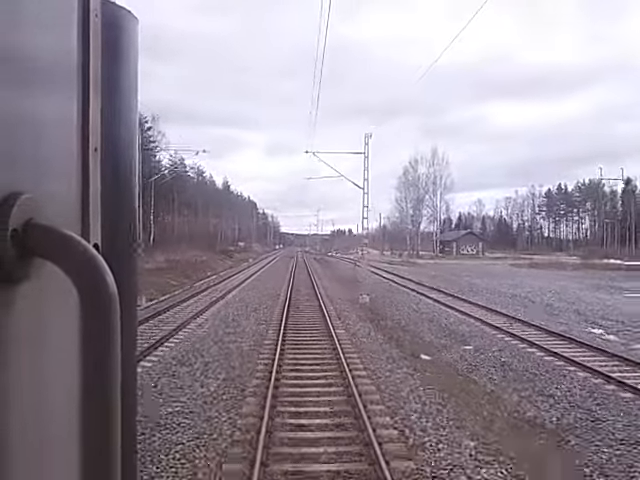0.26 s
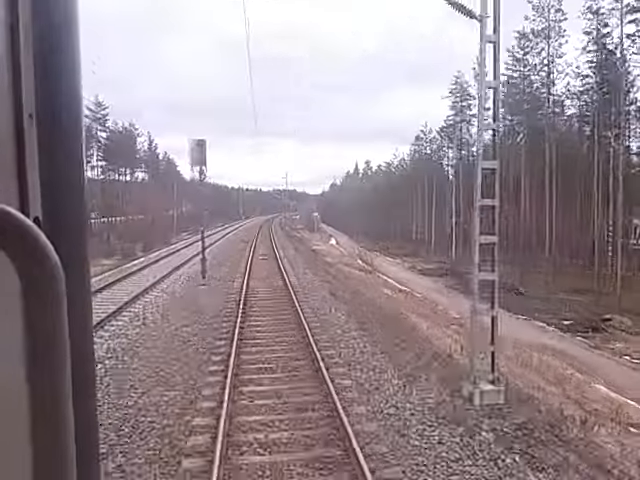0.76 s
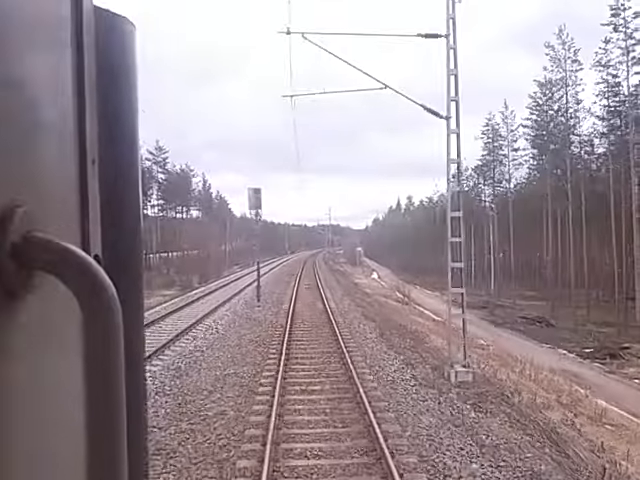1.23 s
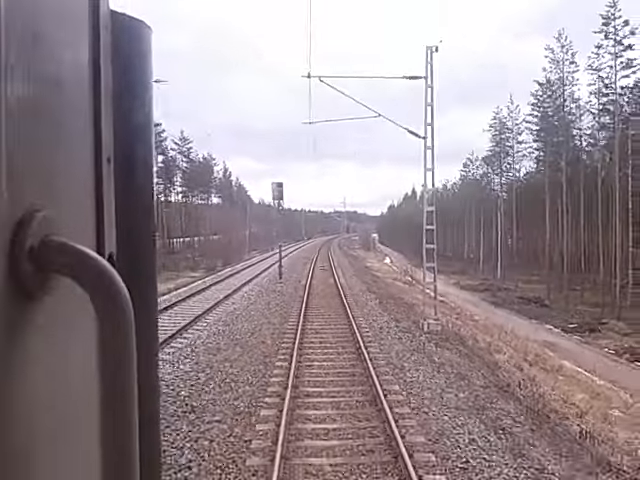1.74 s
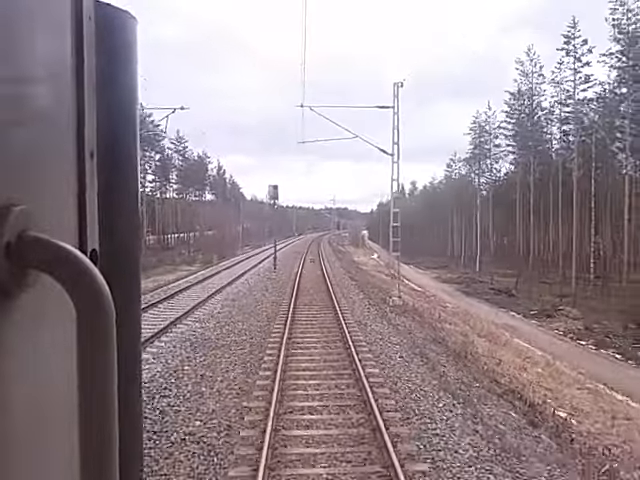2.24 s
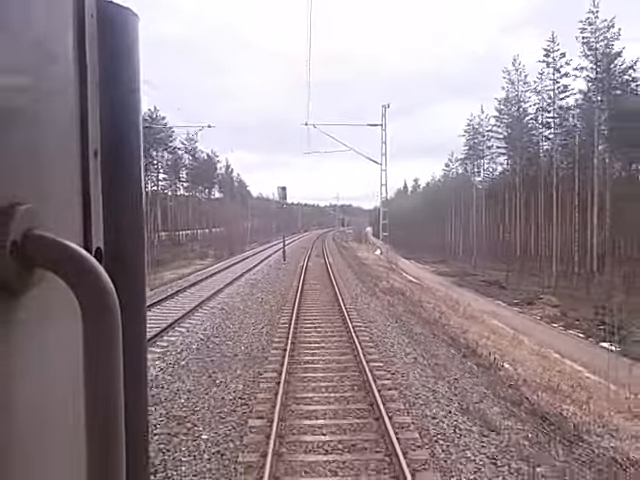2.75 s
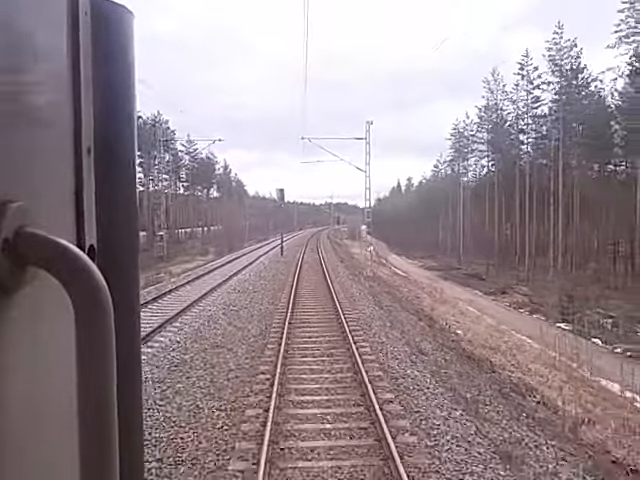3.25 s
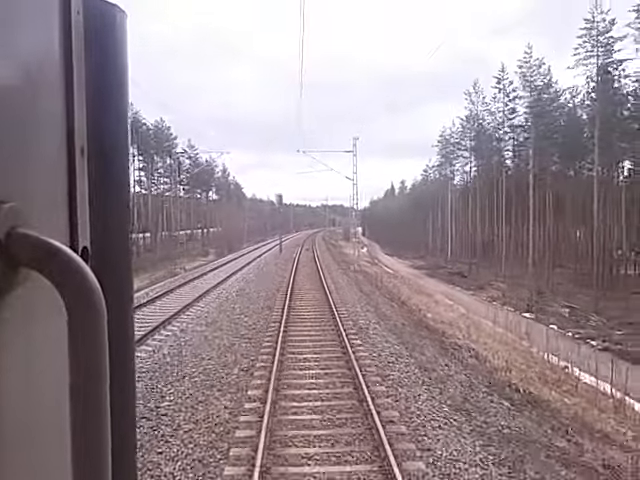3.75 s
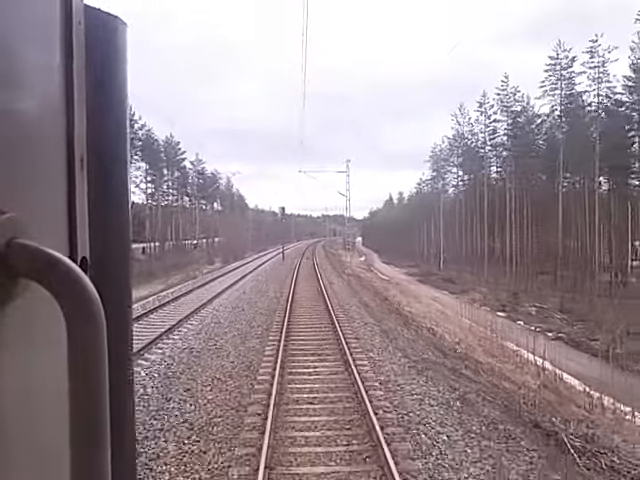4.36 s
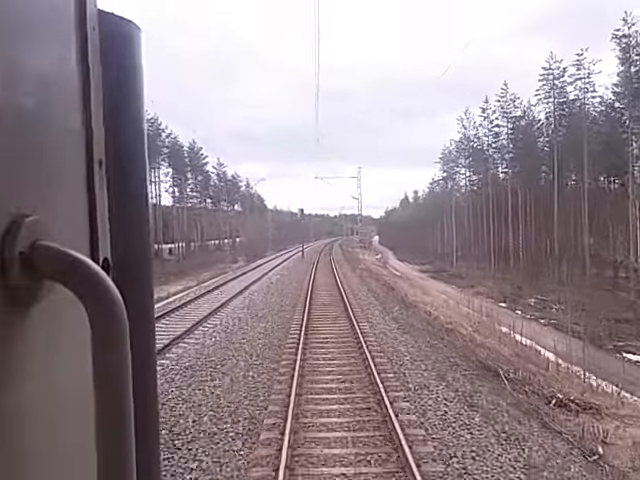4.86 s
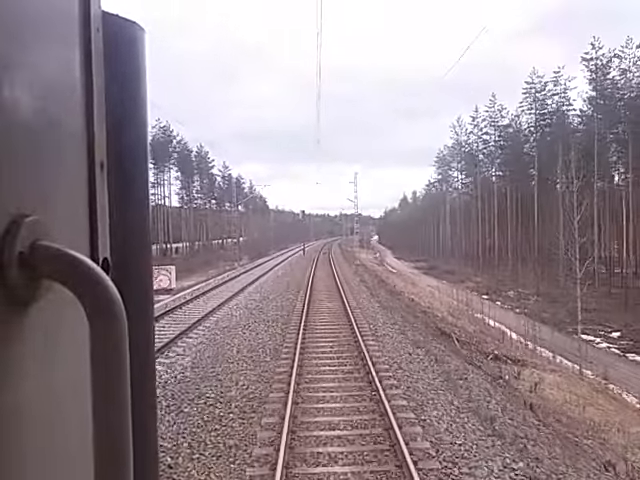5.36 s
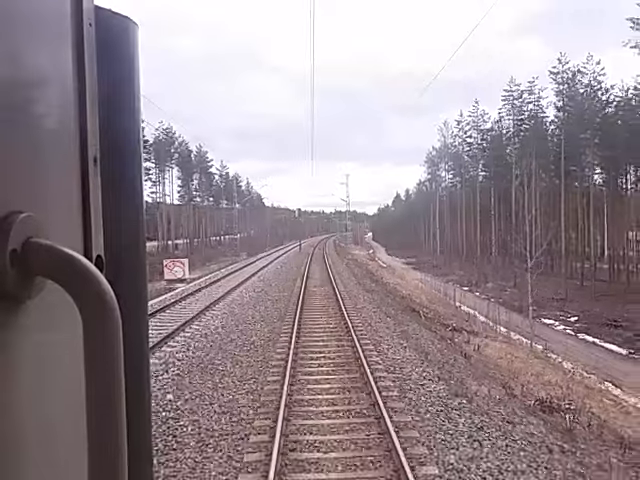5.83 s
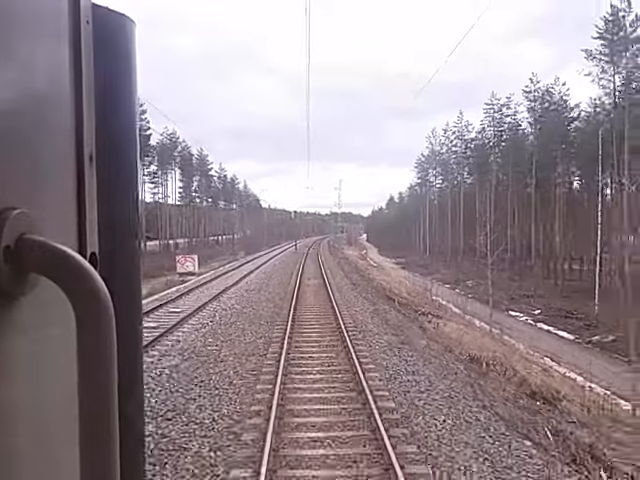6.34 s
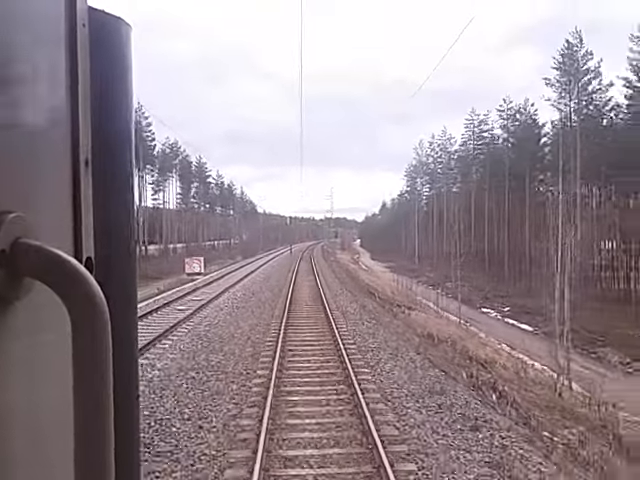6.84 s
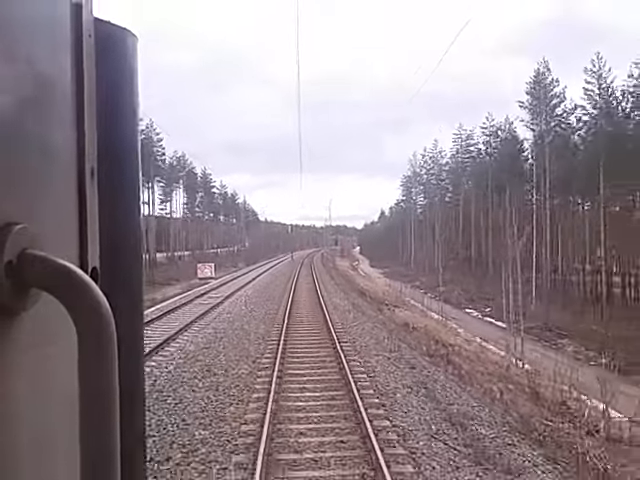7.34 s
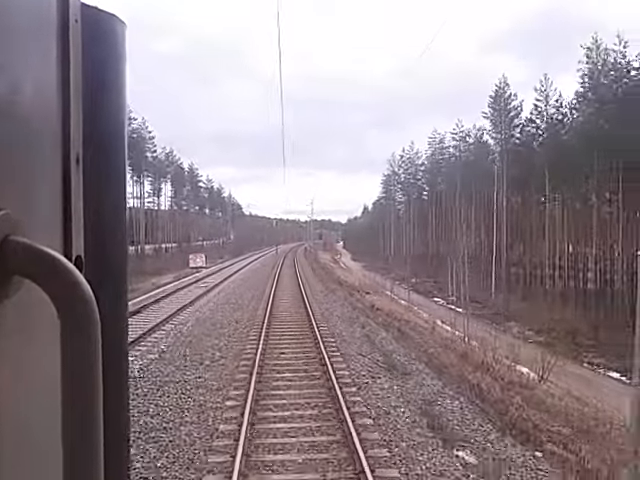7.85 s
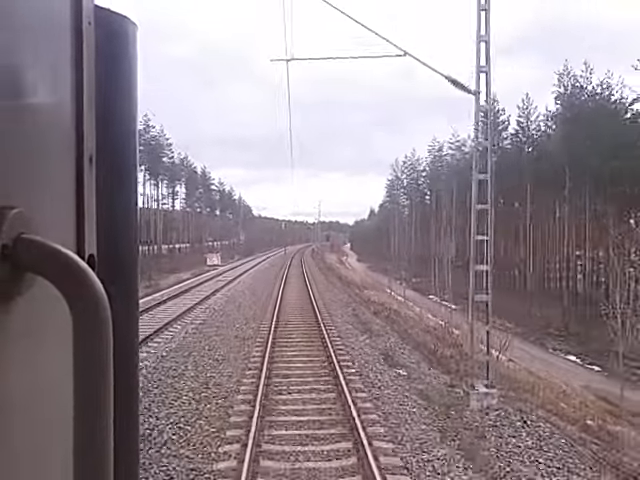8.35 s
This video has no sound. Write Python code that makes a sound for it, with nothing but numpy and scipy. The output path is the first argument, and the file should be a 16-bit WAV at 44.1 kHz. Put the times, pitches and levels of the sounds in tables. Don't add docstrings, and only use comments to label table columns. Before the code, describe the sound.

Inside the closed cab of a moving electric locomotive, a small mono microphone picks up deep booming air and a drumming floor. Two joint hits clatter in the first second, the second hardest, then a tiny tick and abrupt cut to calmer rolling with a knock. Another pair of clanking joints comes around three seconds; afterwards only wavering rumble, faint steel ringing and hiss.

```python
import sys
import numpy as np
from scipy import signal
from scipy.fft import rfft, irfft, next_fast_len
from scipy.io import wavfile
from scipy.ndimage import uniform_filter1d, map_coordinates

SR = 44100
rng = np.random.default_rng(int(sys.argv[2]) if len(sys.argv) > 2 else 0)


def bounce(signal):
    frames = np.transpose(np.atleast_2d(signal))
    limited = np.clip(frames, -1, 1)
    pcm = np.round(limited * 32767).astype(np.int16)
    wavfile.write(sys.argv[1], SR, pcm)


def gain_from_db(level_db):
    decades = np.asarray(level_db, float) / 20
    return 10 ** decades


N = 379247
SPLICE_S = 0.744
EVEN_DB, SMOOTH_DB = -32, -42


def unit(x):
    return x / np.sqrt(np.mean(x ** 2) + 1e-20)


def along(points, hz):
    f, v = np.transpose(points)
    return np.interp(np.log(hz + 1), np.log(f + 1), v)


def curves(rows):
    s, *columns = np.transpose(rows)
    return [np.interp(np.arange(N) / SR, s, column) for column in columns]


def wobble(rate):
    step = np.arange(0, N + 32, 32)
    knots = rng.standard_normal(int(N * rate / SR) + 4)
    return np.interp(np.arange(N), step, map_coordinates(knots, [step * rate / SR]))


def ringing(x, modes, steep, tilt_db=lambda hz: 0):
    m = 2 ** 15
    hz = np.fft.rfftfreq(m, 1 / SR)
    power = 0
    for centre, width, db in modes:
        detuning = (centre * centre - hz * hz) / (hz * width + 1e-9)
        power = power + gain_from_db(2 * db) * np.exp(-steep * np.log1p(detuning ** 2))
    gain = np.sqrt(power / power.mean()) * gain_from_db(tilt_db(hz))
    cepstrum = irfft(np.log(gain + 1e-6), m)
    cepstrum[1:m // 2] *= 2
    cepstrum[m // 2 + 1:] = 0
    response = irfft(np.exp(rfft(cepstrum)), m)[:m // 2]
    return signal.fftconvolve(x, response)[:len(x)]


def roughness(patchy_db):
    z = signal.stft(rng.standard_normal(N + SR), nperseg=512)[2]
    field = uniform_filter1d(rng.standard_normal(z.shape), 8, 0)
    field = uniform_filter1d(field, 16, 1)
    patches = signal.istft(z * gain_from_db(patchy_db * unit(field)), nperseg=512)[1]
    return unit(patches[:N + SR // 2])


# frequency in Hz, density in dB per Hz.
HISS_DENSITY = [(3000, -4), (6500, -5), (7400, -2.5), (7900, .5), (9000, 0), (14000, 0), (14800, 1.5),
                (15300, 5), (15600, 9), (15750, 9)]


def microphone_hiss():
    m = next_fast_len(N + SR, True)
    hz = np.fft.rfftfreq(m, 1 / SR)
    spectrum = rfft(rng.standard_normal(m)) * gain_from_db(along(HISS_DENSITY, hz))
    return gain_from_db(-62.5) * unit(irfft(spectrum, m))[:N]


# time in seconds, level in dB.
WHINE_DRIFT = [(0.0, -67), (0.29, -70), (0.62, -62), (0.86, -73), (1.63, -75), (1.75, -63), (2.32, -73),
               (2.59, -65), (3.16, -80), (3.71, -64), (4.67, -72), (4.81, -65), (6.13, -73), (6.47, -83),
               (6.7, -69), (8.12, -76), (8.29, -67), (8.6, -79)]
# frequency in Hz, level in dB.
BUZZ_LINES = [(7787, -96), (7836, -94), (7887, -92), (7936, -92), (7986, -99), (15150, -93), (15374, -89)]


def converter():
    t = np.arange(N) / SR
    whine_db = curves(WHINE_DRIFT)[0] + 7 + 1.8 * wobble(25) + 1.5 * wobble(7)
    sound = gain_from_db(whine_db) * np.sin(2 * np.pi * 15597 * t + 0.9 * wobble(5))
    for hz, db in BUZZ_LINES:
        sound += gain_from_db(db + 0.5 + 3 * wobble(1.5)) * np.sin(2 * np.pi * hz * t + 1.2 * wobble(6))
    return sound


# frequency in Hz, width in Hz, level in dB.
PANEL_MODES = [(293.7, 24.6, -11), (337, 26, -10), (366.2, 19.6, -14.5), (413, 37, -14), (465.2, 22, -11.5),
               (521, 44, -12.5), (556.5, 21.4, -9.5), (648, 5.6, -18.5), (710.6, 54, -19), (802, 117, -28),
               (880, 56, -27.5), (951, 140, -27), (1032, 28, -29), (1100, 39, -28.5)]
# frequency in Hz, width in Hz, level in dB.
WHEEL_MODES = [(1185, 21, 8), (1220, 21, 3), (1234, 165, 0), (1592, 750, -2.5), (1915, 147, -0.5),
               (2200, 414, 0.5), (2600, 560, -4), (3000, 970, -7.5), (4040, 1340, -9.5), (4420, 890, -16),
               (5230, 1000, -18)]


def rolling(rough_db):
    track = wobble(5)
    panel_db = rough_db - 0.18 + 0.6 * track
    panels = gain_from_db(panel_db) * ringing(roughness(patchy_db=1.0), PANEL_MODES, steep=1.59)[-N:]
    ring_db = -50.5 + 0.43 * (rough_db - SMOOTH_DB) + 0.38 * track + 0.27 * wobble(8.1)
    wheels = gain_from_db(ring_db) * ringing(roughness(patchy_db=0.5), WHEEL_MODES, steep=2.36)[-N:]
    return panels + wheels


def drone(modes, level_db, dips, span, loose, wander):
    x = ringing(roughness(patchy_db=-1.0), modes, steep=1.756)[-N:]
    width = round(span * SR)
    swell = np.abs(uniform_filter1d(uniform_filter1d(x ** 2, width), width)) + 0.03
    t = np.arange(N) / SR
    step = t[::64]
    bumps = sum(gain_from_db(db) * np.exp(-0.5 * ((step - s) / half) ** 2) for s, db, half in dips)
    firm = np.interp(t, step, bumps)
    song = np.zeros(N)
    for hz, _, db in modes:
        song += gain_from_db(db) * np.sin(2 * np.pi * hz * t + wander * wobble(13))
    murmur = gain_from_db(level_db) ** 2 / (gain_from_db(level_db) + firm)
    return murmur * swell ** ((loose - 1) / 2) * x + 1.324 * firm * unit(song)


# frequency in Hz, width in Hz, level in dB.
BODY_MODES = [(56, 13, -11.5), (79.7, 16, 2.5)]
# time in seconds, level in dB, half length in seconds.
SWAY_DIPS = [(0.446, -29.5, 0.025), (0.63, -43, 0.035), (0.853, -29, 0.028), (1.174, -29, 0.067),
             (1.288, -36, 0.023), (1.62, -38.2, 0.17), (2.84, -38, 0.032), (3.152, -39, 0.022),
             (3.813, -36, 0.045), (4.53, -49, 0.021), (4.81, -35, 0.017), (5.54, -35, 0.034),
             (6.59, -34, 0.034), (7.243, -38.1, 0.027), (7.473, -28.5, 0.032), (7.694, -30.6, 0.025)]


def body_sway(uneven_db):
    level_db = -38 + 1.45 * (uneven_db - EVEN_DB)
    return drone(BODY_MODES, level_db, SWAY_DIPS, span=0.04, loose=0.8, wander=1.2)


# frequency in Hz, width in Hz, level in dB.
FLOOR_MODES = [(157.7, 30.3, -10), (207.6, 14.1, 0), (243.1, 18.2, -2.5), (270.7, 10.7, -12)]
# time in seconds, level in dB, half length in seconds.
DRUM_DIPS = [(0.107, -33.5, 0.015), (0.23, -31.5, 0.021), (0.45, -33, 0.022), (0.593, -37, 0.038),
             (0.935, -30.5, 0.037), (1.485, -35.5, 0.035), (1.778, -44, 0.033), (1.965, -34, 0.039),
             (2.916, -31, 0.017), (3.56, -39, 0.019), (3.985, -34.5, 0.064), (4.78, -34.5, 0.026),
             (4.958, -35, 0.032), (6.072, -34, 0.02), (6.685, -42.5, 0.022), (7.715, -33.6, 0.018)]


def floor_drum(rough_db):
    level_db = -36.5 + (rough_db - SMOOTH_DB)
    return drone(FLOOR_MODES, level_db, DRUM_DIPS, span=0.11, loose=0.45, wander=1.2)


# frequency in Hz, gain in dB.
JOLT_COLOUR = [(150, 11), (300, 0), (500, 0.5), (750, 7.5), (1000, 5.5), (1300, -13), (1700, 3),
               (2800, 1.5), (4500, 1), (6500, -6), (9000, -25)]


def jolts(events, modes, peak, steep, rattle_db, swell):
    out = np.zeros(N + SR)
    t = np.arange(SR // 2) / SR
    rise = np.sin(np.pi / 2 * np.minimum(t / peak, 1)) ** swell
    for s, db, centre_hz, boost_db, t60 in events:
        steps = np.repeat(rng.standard_normal(SR // 128 + 1), 64)[:len(t)]
        rattle = unit(gain_from_db(rattle_db * steps) * rng.standard_normal(len(t)))
        fall_db = 60 * np.maximum(t - peak, 0) / max(t60, 0.02)
        force = rise * gain_from_db(db - fall_db) * rattle

        def colour(hz):
            favoured = np.exp(-(np.log(hz / centre_hz + 1e-9) / 0.13) ** 2)
            return along(JOLT_COLOUR, hz) + boost_db * favoured

        heard = (s > SPLICE_S) | (s + t < SPLICE_S)
        out[round(s * SR):][:len(t)] += ringing(force, modes, steep, colour) * heard
    return out[:N]


# start in seconds, level in dB.
BODY_DROPS = [
    (.38, -39),
    (.58, -42),
    (.85, -36.5),
    (1.139, -50),
    (2.841, -46),
    (3.141, -39.5),
]


def thuds():
    drops = [(s, db, 54, 11, 0.55) for s, db in BODY_DROPS]
    return jolts(drops, BODY_MODES, peak=0.084, steep=0.95, rattle_db=1, swell=2.1)


# start in seconds, level in dB, favoured pitch in Hz,
# its boost in dB, t60 in seconds.
PANEL_BLOWS = [(.09, -42, 640, 6, 0.11), (.19, -40, 700, .3, .12), (.372, -38, 870, 7, 0.38),
               (.562, -27, 450, 11, 0.13), (.585, -33.5, 700, 11.5, .07), (.558, -34.5, 870, 14, 0.081),
               (.845, -35, 500, 5, 0.21), (.905, -30, 800, -1, 0.23), (2.855, -31, 520, 3.5, 0.27),
               (3.12, -26.5, 727, 15.5, 0.11), (3.113, -30, 1050, 15, 0.2), (3.15, -32, 480, 11.5, .18),
               (3.15, -33.5, 161, 15, 0.12), (2.86, -36.5, 159, 16, 0.17), (.38, -40, 155, 18, .15),
               (1.14, -40.5, 159, 13.5, 0.12), (3.14, -35, 255, 7, .35), (3.9, -47, 570, 16.5, 0.44),
               (7.66, -41.5, 800, 6, 0.26), (7.68, -39, 196, 14, 0.12)]


def knocks():
    return jolts(PANEL_BLOWS, FLOOR_MODES + PANEL_MODES, peak=0.019, steep=1.16, rattle_db=1.0, swell=0.55)


# start in seconds, level in dB, favoured pitch in Hz,
# its boost in dB, t60 in seconds.
WHEEL_BLOWS = [
    (.373, -38, 2150, 4.5, 0.18),
    (.42, -52, 3000, 10, 0.42),
    (.561, -34.5, 2730, 4.5, 0.2),
    (.585, -47, 2000, 4, .12),
    (.615, -50.5, 3070, 17, 0.19),
    (.635, -46.5, 3200, 6, 1.1),
    (2.852, -44, 2200, 1, 0.39),
    (3.116, -41.5, 2810, 8.5, 0.33),
    (3.13, -42.5, 2100, -2, .25),
    (3.45, -54.5, 2250, 9, 0.55),
]


def clangs():
    return jolts(WHEEL_BLOWS, WHEEL_MODES, peak=0.026, steep=1.5, rattle_db=2.5, swell=0.28)


# frequency in Hz, width in Hz, level in dB.
AIR_MODES = [(104.7, 12.5, -1.5), (123.8, 18.2, -10), (159, 7.9, -41.5)]
# time in seconds, level in dB, half length in seconds.
BOOM_DIPS = [(0.03, -54, 0.013), (0.153, -28, 0.025), (0.654, -23.4, 0.045), (0.93, -31, 0.024),
             (1.04, -31, 0.017), (1.291, -24.5, 0.023), (1.354, -27, 0.014), (1.677, -25.0, 0.071),
             (2.642, -31, 0.2), (3.196, -20, 0.016), (3.364, -30, 0.02), (3.456, -24, 0.021),
             (3.564, -25.5, 0.024), (4.037, -25.5, 0.021), (4.137, -28, 0.059), (4.407, -24, 0.093),
             (4.662, -26, 0.015), (4.92, -23.5, 0.018), (5.12, -26, 0.017), (5.524, -23.5, 0.016),
             (5.629, -23.5, 0.022), (5.8, -20.5, 0.028), (6.037, -23.5, 0.041), (6.159, -26.5, 0.024),
             (6.41, -30.5, 0.1), (7.004, -26, 0.017), (7.18, -33, 0.019), (7.418, -24, 0.018),
             (7.514, -31, 0.02), (7.667, -27.5, 0.05)]


def cab_boom(uneven_db):
    return drone(AIR_MODES, uneven_db, BOOM_DIPS, span=0.1, loose=0.75, wander=0.8)


# time in seconds, long-wave unevenness in dB, fine roughness in dB.
RAIL = [(0.0, -27, -37), (.735, -36, -36.5), (.752, -31, -41), (1.35, -29.5, -41.5), (1.75, -34, -42),
        (2.1, -32.5, -42), (2.6, -29, -41), (3.3, -31.5, -40), (3.9, -32, -41), (4.4, -31.5, -41.5),
        (5.1, -31, -41.5), (5.8, -29.5, -41.5), (6.3, -33, -41.5), (7.0, -29.5, -40.5), (7.75, -30, -41),
        (8.0, -34.5, -42.5), (8.6, -34, -41)]


def scene():
    uneven_db, rough_db = curves(RAIL)
    steady = converter() + rolling(rough_db) + body_sway(uneven_db) + floor_drum(rough_db)
    blows = thuds() + knocks() + clangs()
    return (steady + blows + cab_boom(uneven_db))[None]


def top_cut(x):
    return signal.sosfilt(signal.butter(12, 16650, fs=SR, output="sos"), x)


def record(dry):
    bass_cut = signal.butter(4, 42, "high", fs=SR, output="sos")
    heard = signal.sosfilt(bass_cut, dry)
    heard[:, round(SPLICE_S * SR)] += gain_from_db(-44)
    band = signal.firwin(2047, 15730, fs=SR)
    mix = signal.fftconvolve(heard + microphone_hiss(), band[None], "same") - 0.0007
    return top_cut(mix)


dry = scene()
out = record(dry)
bounce(out)
```